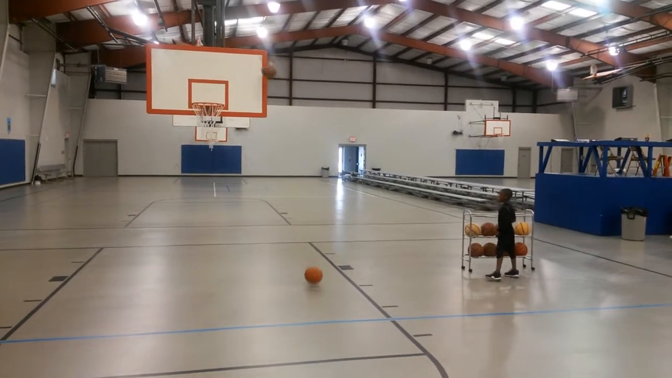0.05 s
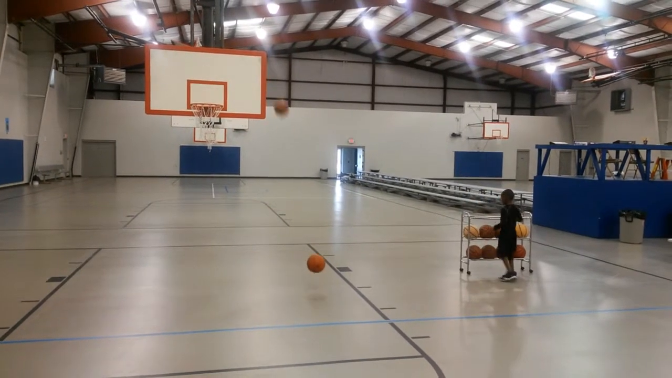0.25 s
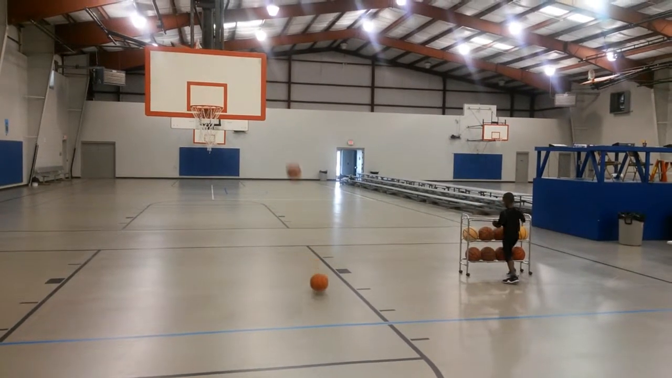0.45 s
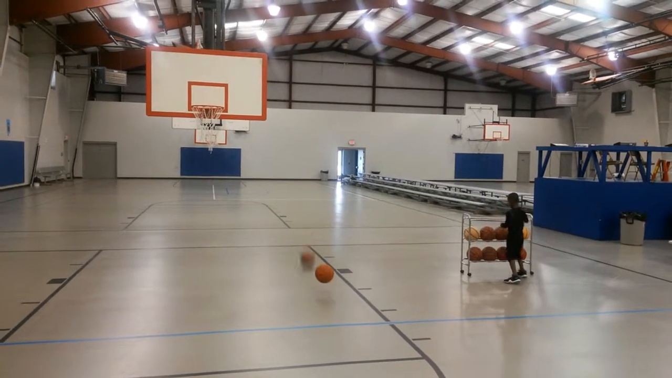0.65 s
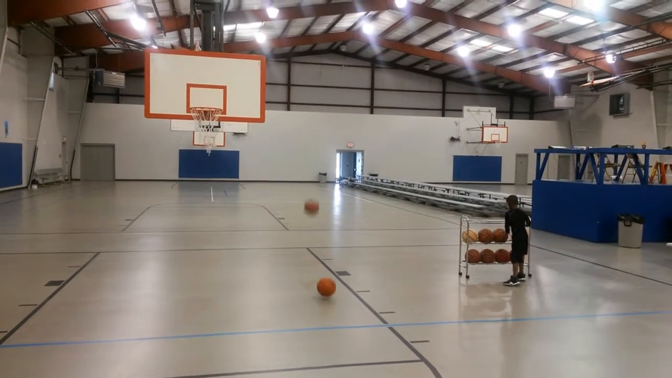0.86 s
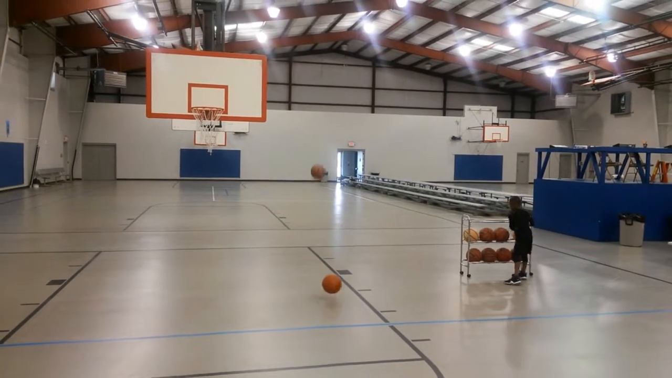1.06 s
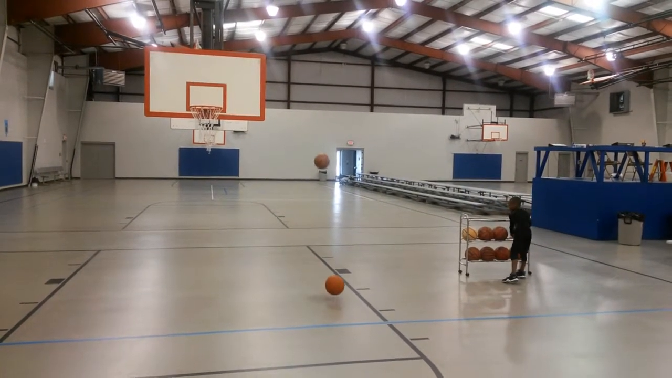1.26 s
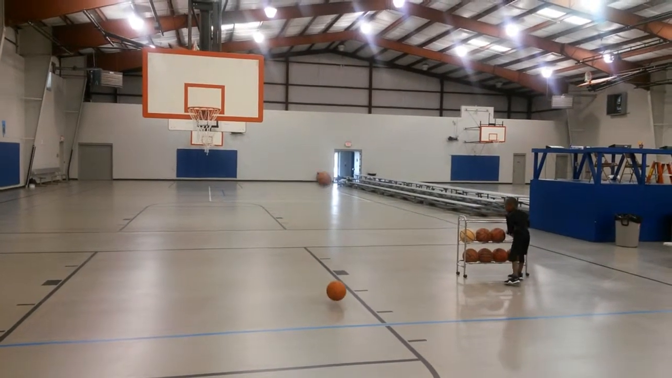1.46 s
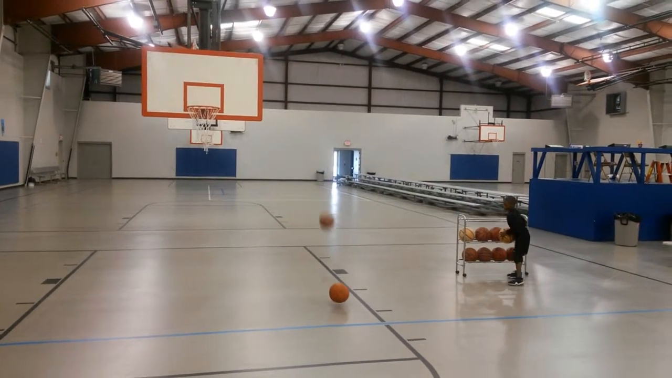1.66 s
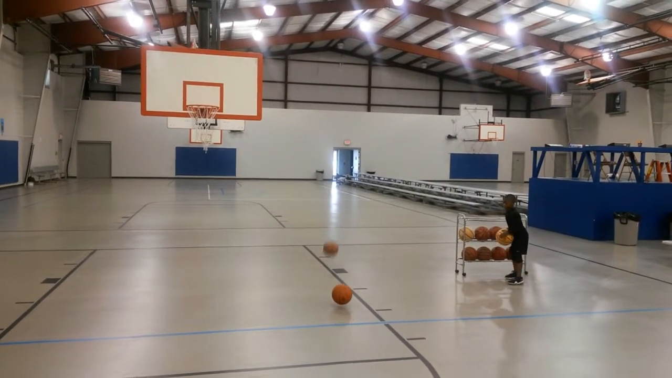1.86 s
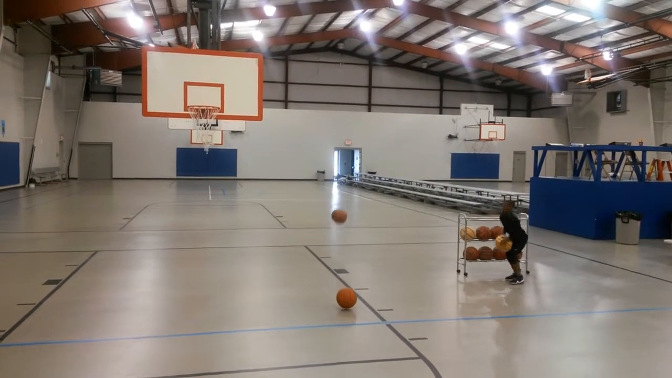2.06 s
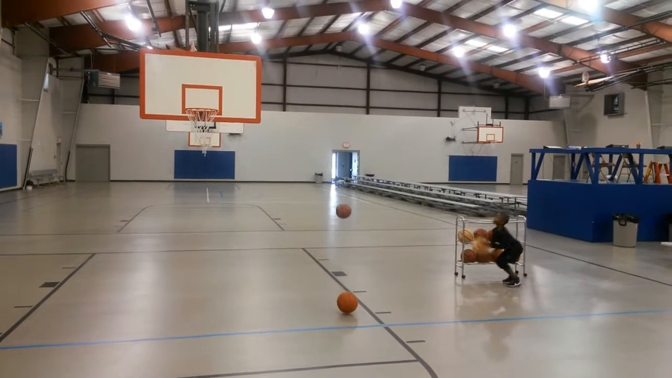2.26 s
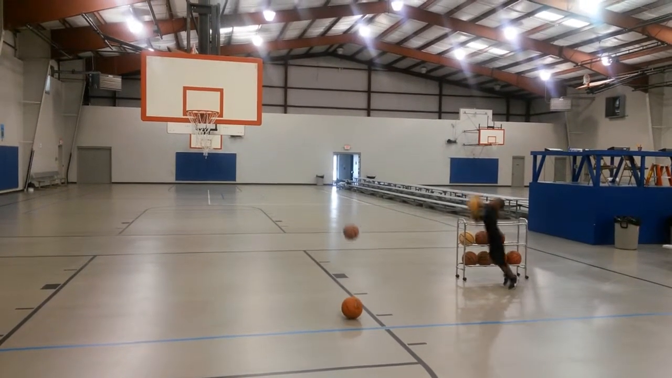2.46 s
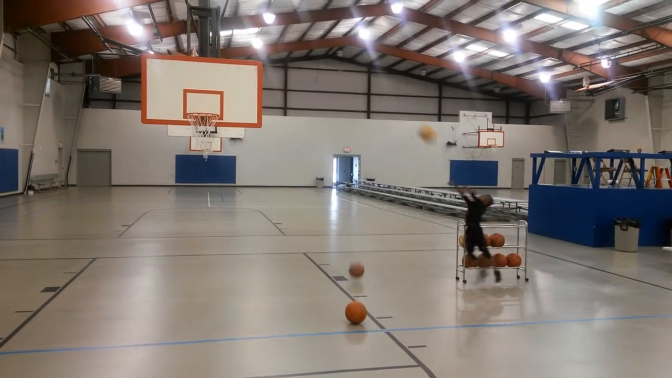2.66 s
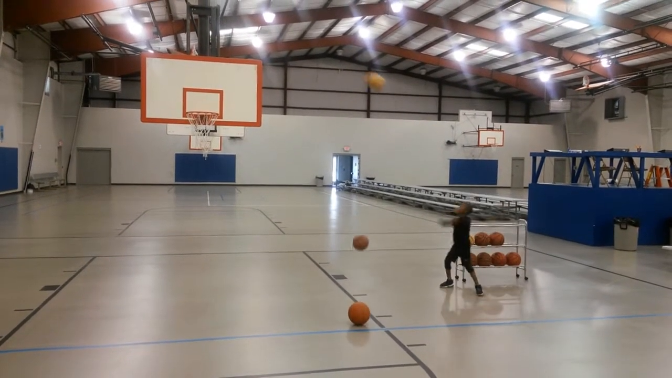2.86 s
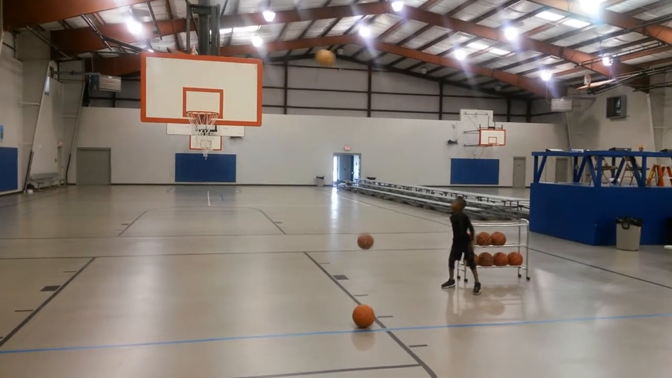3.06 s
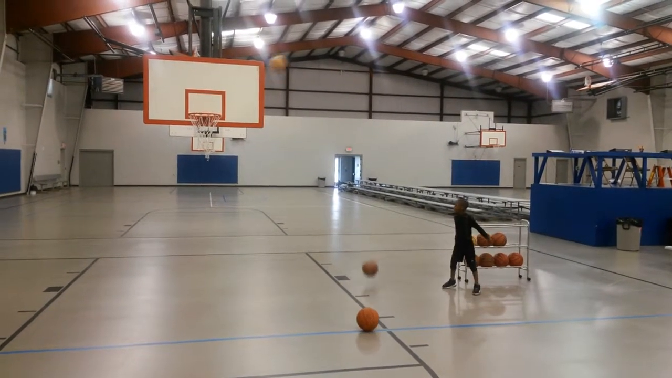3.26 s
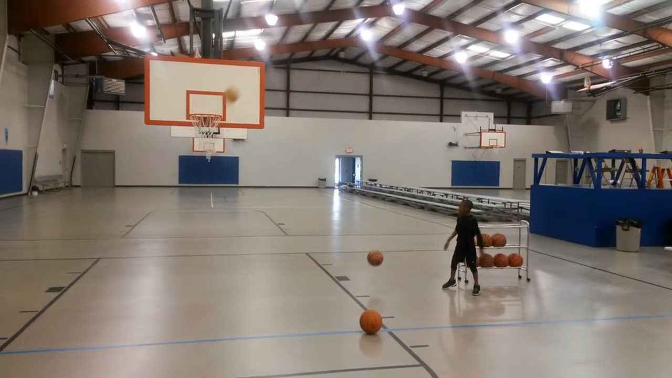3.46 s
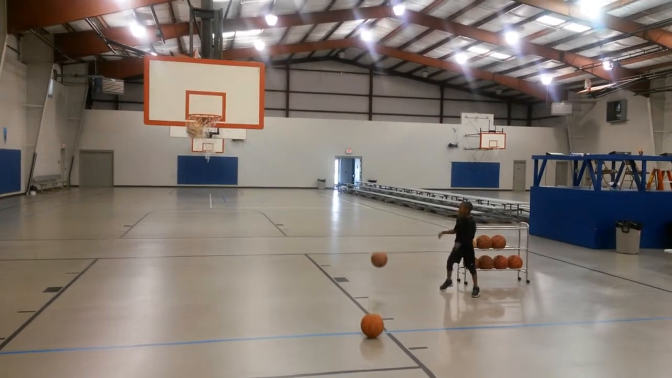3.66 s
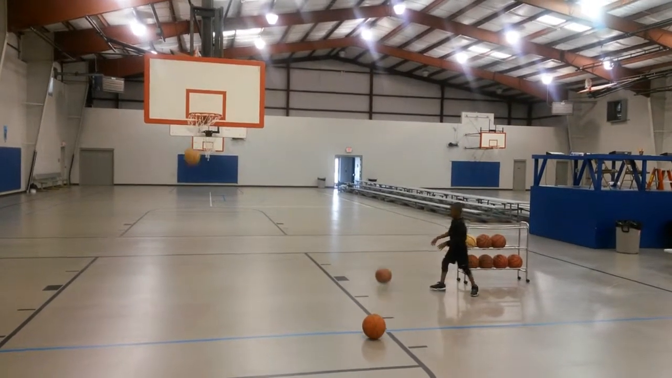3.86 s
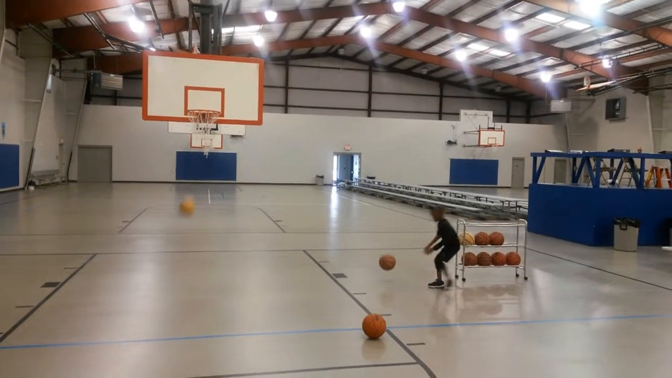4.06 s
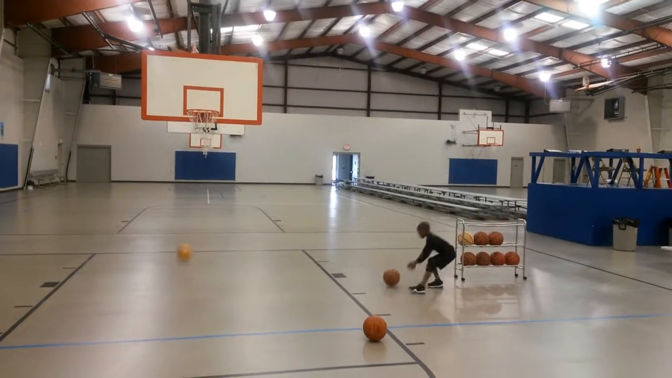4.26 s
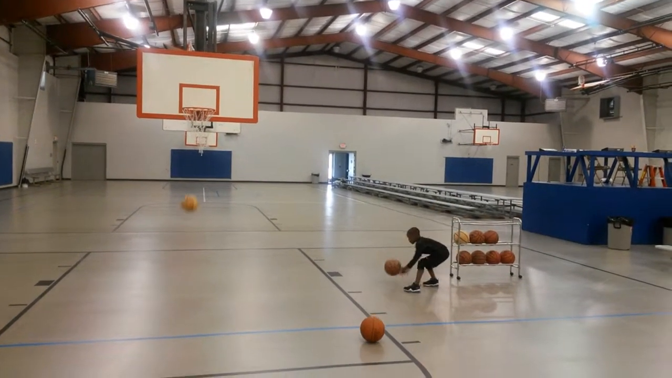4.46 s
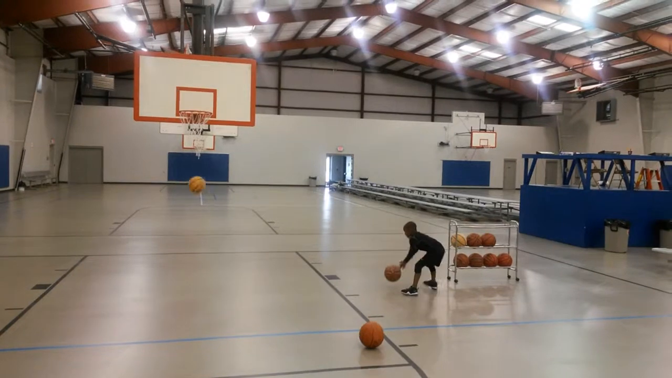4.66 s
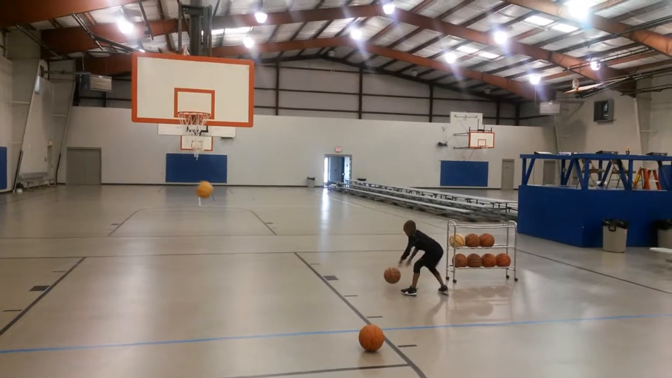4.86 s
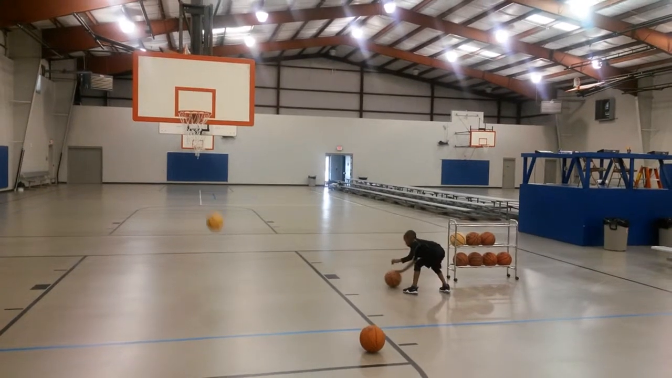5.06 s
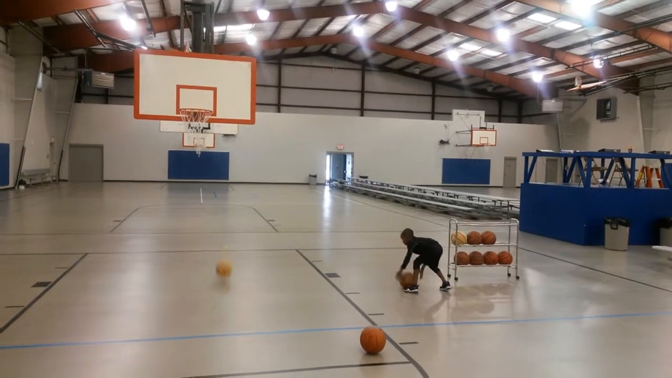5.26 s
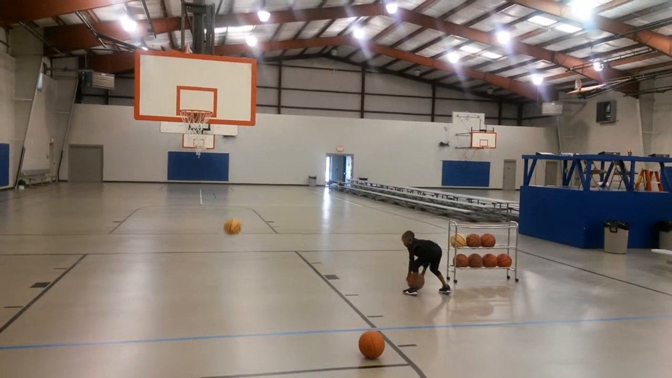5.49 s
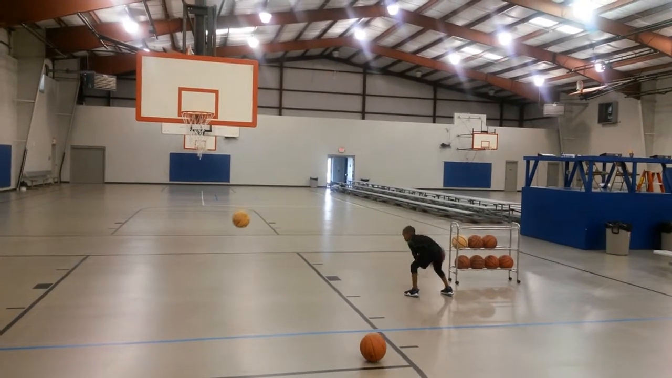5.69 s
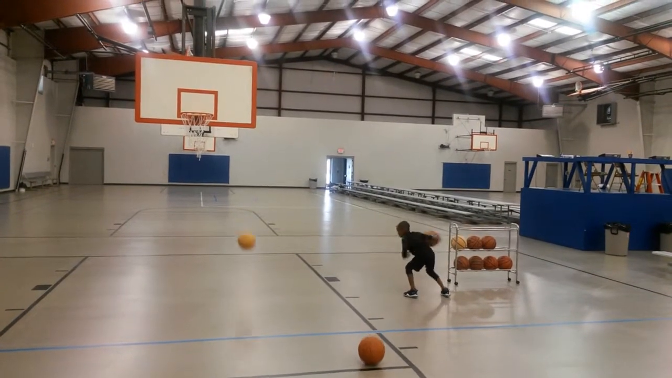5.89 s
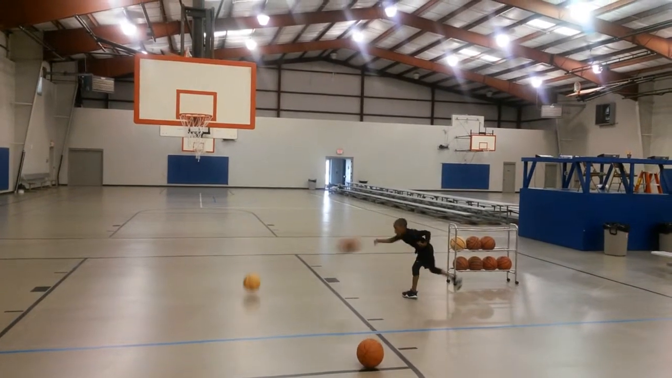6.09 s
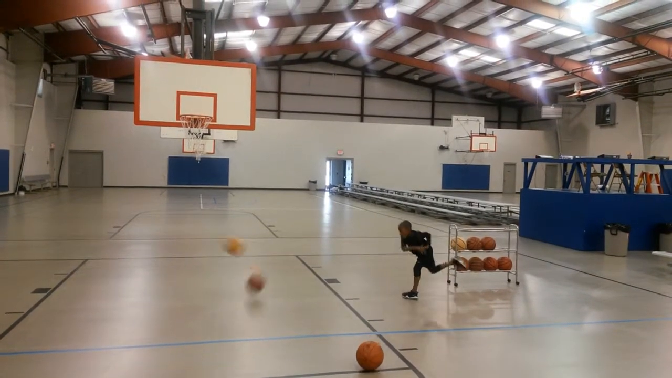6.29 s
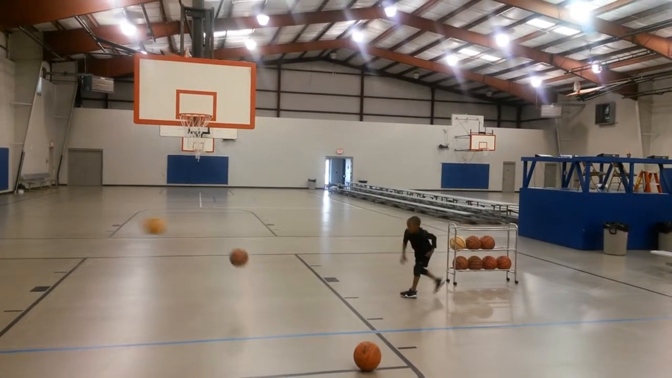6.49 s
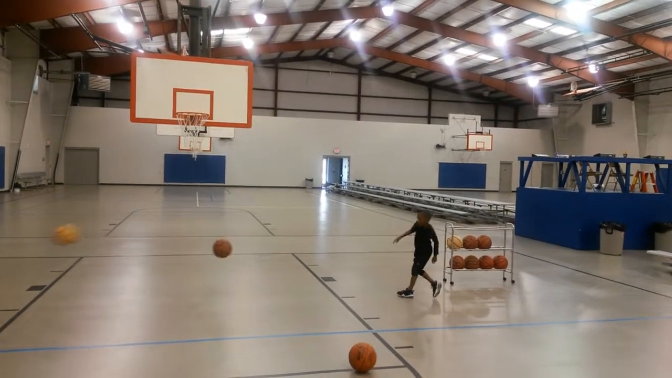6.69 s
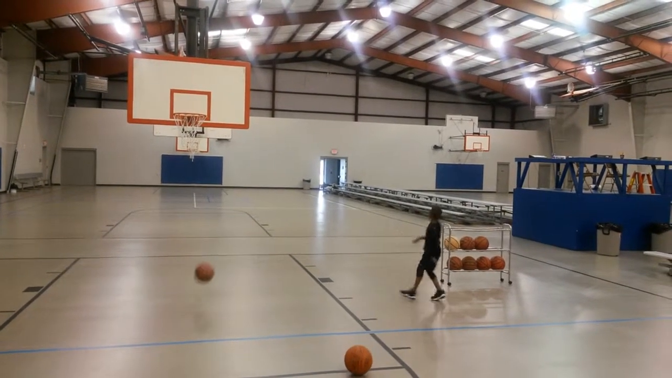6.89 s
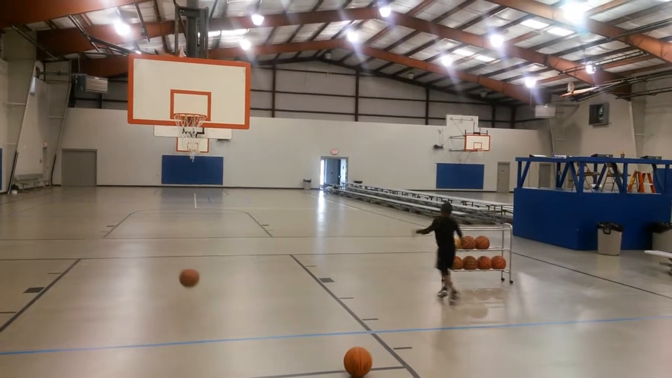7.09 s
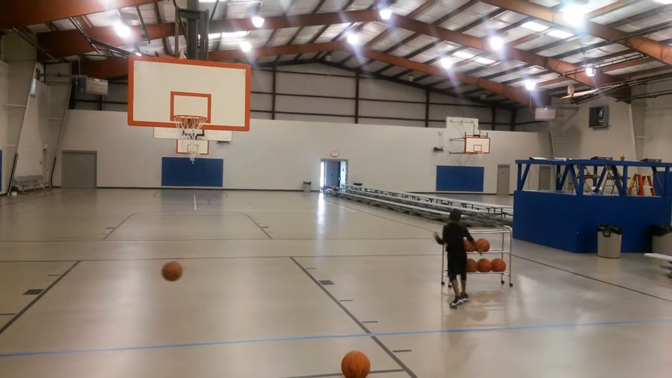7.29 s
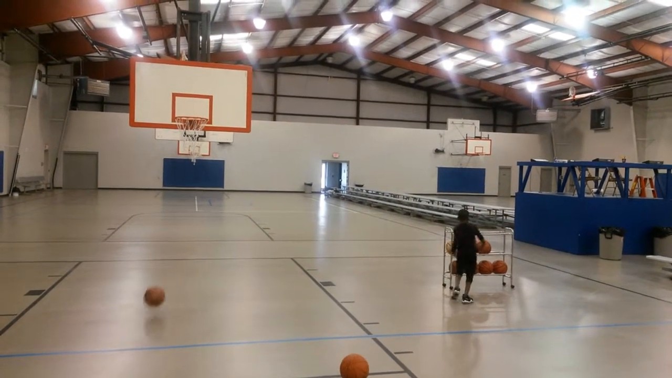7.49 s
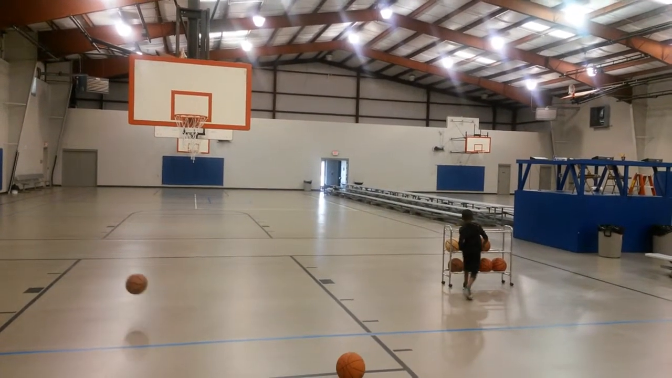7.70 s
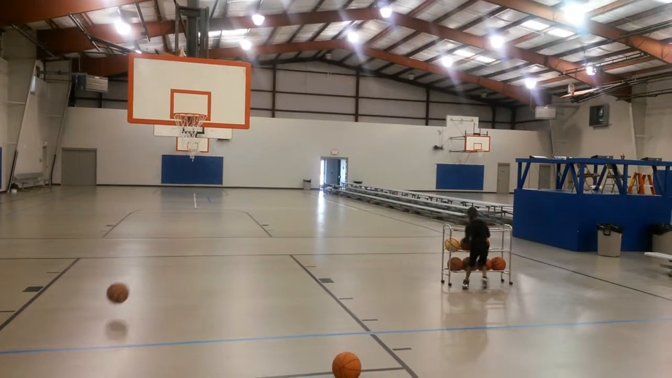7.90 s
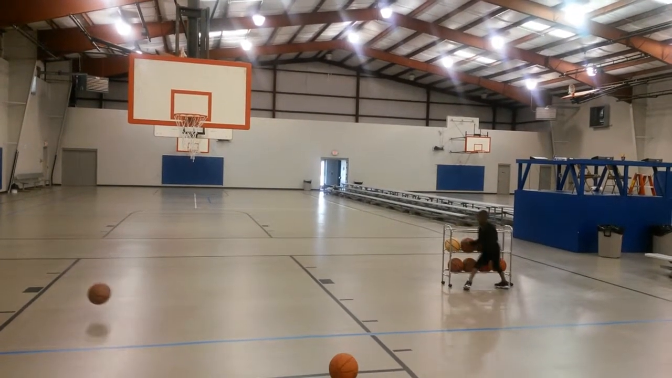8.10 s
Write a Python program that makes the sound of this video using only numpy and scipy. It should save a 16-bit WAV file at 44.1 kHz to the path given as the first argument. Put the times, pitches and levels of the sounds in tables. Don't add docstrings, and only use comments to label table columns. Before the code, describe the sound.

In a large empty gym, several basketballs bounce irregularly on a wooden floor some metres from a handheld stereo microphone. Each is a sharp rubber slap with a brief hollow ring and thud, followed by wall echoes and a long tail. The loudest comes early; a shoe squeaks sharply near three seconds, then the backboard shudders. Lamps buzz thinly over soft ventilation.

```python
import sys
import numpy as np
from scipy import signal
from scipy.fft import rfft, irfft
from scipy.io import wavfile

SR = 44100
rng = np.random.default_rng(int(sys.argv[2]) if len(sys.argv) > 2 else 0)


def linear_from_db(decibels):
    return 10 ** (np.asarray(decibels, float) / 20)


def digitize_waveform(pressure):
    field = np.atleast_2d(pressure).T
    bounded = np.clip(field, -1, 1)
    quanta = np.round(bounded * 32767).astype(np.int16)
    wavfile.write(sys.argv[1], SR, quanta)


N = 358974
PAD = SR
RETURN_DULL_DB = -5

# t/s, slap peak level/dB, thud level/dB, ring level/dB, ring f/Hz
BOUNCES = [(0.1491, -11, -36.5, -27, 2034), (0.584, -10.5, -38, -31.5, 1600), (0.7797, 1.5, -17, -11, 964),
           (1.2479, -14.5, -31.5, -33.5, 1218), (1.912, -9, -26.5, -23.5, 1217),
           (2.7571, -6.5, -31, -24.5, 1154), (3.4178, -14, -32.5, -31.5, 1100),
           (3.948, -18.5, -41.5, -34.5, 1170), (4.335, -4.5, -26.5, -20, 1130),
           (4.362, -21.5, -26.5, -33.5, 1570), (5.361, -4, -29, -21.5, 1250),
           (6.1945, -11, -31.5, -24.5, 1100), (6.349, -9.5, -27, -22, 1683),
           (6.4352, -10.5, -20.5, -20.5, 1060), (7.075, -22, -29, -34.5, 980),
           (7.106, -17.5, -35.5, -26.5, 1140), (7.647, -20, -36.5, -33.5, 1170),
           (8.0835, -22, -39.5, -38.5, 1170)]
# t/s, slap peak level/dB, thud level/dB, ring level/dB
TAPS = [
    (1.501, -24, -52, -39),
    (1.716, -23.5, -65, -39),
    (1.899, -45, -60, -39),
    (4.878, -29, -43.5, -42.5),
    (5.13, -31, -41.5, -42.5),
    (7.7545, -27, -39, -34),
    (7.8106, -19, -60, -47),
]
TAP_HZ = 1720
# delay t/s, slap loss level/dB, thud loss level/dB, ring loss level/dB
WALLS = [
    (.032, -19, -8, -17),
    (.075, -21, -22, -28),
]


def bounces(direct, send):
    for s, slap_db, thud_db, ring_db, ring_hz in BOUNCES + [(*tap, TAP_HZ) for tap in TAPS]:
        lag = left_lag(s)
        add(direct, s, blow(slap_db, thud_db, ring_db, ring_hz), lag)
        near_echo = off_wall(blow(slap_db - 8, thud_db + 3, ring_db, ring_hz))
        add(direct, s + .0098, linear_from_db(-12) * near_echo, -lag)
        for delay_s, *loss_db in WALLS:
            levels_db = np.add([slap_db + RETURN_DULL_DB, thud_db, ring_db], loss_db)
            add(direct, s + delay_s, off_wall(off_wall(blow(*levels_db, ring_hz))), 1)
        farther_db = min(0.2967 * (-21.5 - ring_db), 5)
        add(send, s, linear_from_db(1.63 + farther_db) * all_round(slap_db, thud_db, ring_db), 0)


# f/Hz, level/dB, time to fall 60 dB t/s
BALL = [(720, -5, 0.0093), (958, -13, 0.02), (1250, 0, 0.005), (1680, -3.5, 0.009), (2040, -4, 0.0045),
        (2570, -12, 0.0027), (2960, -11, 0.0017)]
# f/Hz, level/dB, time to fall 60 dB t/s
FLOOR = [(136, 3, 0.02), (188, 3, 0.02), (259, 2.5, 0.017), (340, 1.5, 0.012), (413, -1.5, 0.014),
         (647, -14, 0.013)]
# f/Hz, level/dB, time to fall 60 dB t/s
PORT = [(4060, -4, 0.0017), (5290, 16, 0.0014), (6680, 13.5, 0.0015), (8150, 5, 0.00067),
        (13000, -5.5, 0.0013)]
SLAP_DB = -13


def blow(slap_db, thud_db, ring_db, ring_hz):
    patches = .035 * rng.standard_normal(90) ** 3 * np.exp(-np.arange(90) / 30.)
    patches[0] = 1
    slap = ring(patches, PORT)
    centre_swing = (ring_hz, 0.5, 0.0092)
    air = ring(patches, sorted(BALL + [centre_swing]), ring_hz)
    slow_push = np.hanning(int(.003 * SR))
    thud = np.pad(ring(slow_push, FLOOR), (int(.0012 * SR), 0))[:len(air)]
    crack = np.convolve(patches, np.linspace(1, -1, 12))
    crack = np.pad(crack, (0, len(air) - len(crack)))
    crack = linear_from_db((slap_db + SLAP_DB + ring_db) / 2 - 1) * crack
    return crack + linear_from_db(thud_db) * thud + linear_from_db(ring_db - 2) * air + linear_from_db(slap_db + SLAP_DB) * slap


def ring(push, modes, centre_hz=None):
    t = np.arange(SR // 8) / SR
    hz, db, t60 = np.transpose(modes)[:, :, None]
    if centre_hz:
        db = db - 5 * np.abs(np.log2(hz / centre_hz))
    level_chance, pitch_chance = rng.standard_normal((2, len(modes), 1))
    hz = hz * (1 + .03 * pitch_chance)
    sense = (-1.) ** np.arange(len(modes))[:, None]
    swing = np.sin(2 * np.pi * hz * t) * 1000. ** (-t / t60)
    body = sense * linear_from_db(db + level_chance) * swing
    return unit(np.convolve(np.diff(body.sum(0), prepend=0), push))


def unit(x):
    return x / np.sqrt(np.sum(x[:SR // 100] ** 2) / (SR // 100))


def all_round(slap_db, thud_db, ring_db):
    place = np.log(np.fft.rfftfreq(1024, 1 / SR) + 1)
    levels_db = [thud_db, ring_db, ring_db, slap_db + SLAP_DB]
    colour_db = np.interp(place, np.log([450, 900, 2600, 4200]), levels_db)
    return np.roll(irfft(linear_from_db(colour_db + 31.0)), 128)


# t/s, lag/samples
LEFT_LAG = [(0, 1), (.8, 2), (2.7, -1), (4., -2), (4.3, 7), (6.4, 4), (7.1, 9), (7.7, 13), (8.1, 17)]


def left_lag(s):
    return np.interp(s, *np.transpose(LEFT_LAG))


# t/s, slap peak level/dB, body level/dB
END_WALL = [
    (0.939, -28, -35),
    (0.9448, -9, -34),
    (2.931, -18, -35),
    (4.493, -17, -43),
    (5.523, -17, -44.5),
]


def end_wall(direct):
    for s, slap_db, body_db in END_WALL:
        add(direct, s, off_wall(blow(slap_db + RETURN_DULL_DB, body_db - 9, body_db, 1230)), 1)


def off_wall(x):
    facets = .045 * rng.standard_normal(70) ** 3 * np.exp(-np.arange(70) / 25.)
    facets[0] = 1
    dull = signal.sosfilt(signal.butter(3, 7200, fs=SR, output="sos"), x)
    return np.convolve(dull, facets / np.sqrt(np.sum(facets ** 2)))


# t/s, peak level/dB, f/Hz, length t/ms
SQUEAKS = [
    (0.385, -31, 6300, 6),
    (0.392, -29, 5650, 7),
    (2.8888, -4.5, 6300, 4.8),
]
# delay t/s, loss level/dB
SQUEAK_WALLS = [
    (.0297, -14.5),
    (.0387, -10.5),
    (.0772, -19.5),
]


def squeaks(direct, send):
    for s, peak_db, hz, length_ms in SQUEAKS:
        for delay_s, loss_db in [(0, 0)] + SQUEAK_WALLS:
            add(direct, s + delay_s, squeak(peak_db + loss_db, hz, length_ms), 1)
        add(send, s, linear_from_db(4) * squeak(peak_db, .97 * hz, 1.2), 0)


def squeak(peak_db, hz, length_ms):
    t = np.linspace(0, 1, int(length_ms * SR / 1000))
    uneven = 1 + .25 * np.interp(t, np.linspace(0, 1, 9), rng.standard_normal(9))
    cycles = hz * length_ms / 1000 * (1.03 * t - .04 * t ** 2)
    chirp = uneven * np.sin(np.pi * t) ** 1.5 * np.sin(2 * np.pi * cycles)
    grain = np.hanning(30) * np.sin(2 * np.pi * 0.95 * hz * np.arange(30) / SR)
    slips = .04 * np.convolve(rng.standard_normal(300) * np.linspace(1, .2, 300), grain)
    return linear_from_db(peak_db) * np.concatenate([chirp[:-12], slips])


def band_part(x, hz, kind):
    return signal.sosfiltfilt(signal.butter(2, hz, kind, fs=SR, output="sos"), x)


def add(out, s, x, lag):
    creep = band_part(x, (2900, 4600), "band")
    boost = .05 * np.clip(lag, 0, 8) * creep
    late = round(5 * np.clip(lag - 1, 0, 1))
    left = x - .5 * band_part(x, 7800, "high") - creep + np.roll(creep + boost, late)
    right = x + boost - np.clip(.06 * lag, 0, .55) * band_part(x, (4600, 7400), "band")
    round_body = .88
    paths = [(0, round(lag), round_body * left), (0, 0, (1 - round_body) * left), (1, 0, right)]
    for channel, shift, heard in paths:
        i = PAD + round((s + .0006) * SR) + shift
        out[channel, i:i + len(x)] += heard[:max(out.shape[1] - i, 0)]


# f/Hz, level/dB, time to fall 60 dB t/s, likeness of the two ports/0-1
HALL = [(90, 1, 2.48, 0.94), (221, 3.5, 2.6, 0.87), (380.5, -3.5, 2.1, 0.44), (643, -15, 3.4, 0.1),
        (893, -9.5, 2.1, 0), (1200, -9, 2.17, 0), (1635, -9, 2.36, 0), (2360, -15, 2.9, 0.07),
        (2860, -17, 3.08, 0), (4800, -13.5, 2.21, 0), (5930, -12.5, 2.03, 0.26), (8100, -23.5, 1.8, 0.9),
        (14000, -32.5, 0.56, 0.3)]


def hall(send):
    size = 3 * SR
    t = np.arange(size) / SR
    hz, db, t60, likeness = np.transpose(HALL)
    tail = np.zeros((2, size))
    for k, weight in enumerate(bands(hz, size)):
        noise = irfft(pair(size, likeness[k]) * weight)
        tail += linear_from_db(db[k]) * noise * 1000. ** (-t / t60[k])
    clumps = np.interp(t, np.arange(600) * .005, rng.standard_normal(600))
    tail = tail * linear_from_db(3.5 * clumps * np.exp(-t / .5))
    early = 1 + 3.3 * np.exp(-t / 0.021)
    rise = np.clip((t - .017) / .018, 0, 1)
    late_fill = linear_from_db(-27.5 - 6 * np.exp(-t / 0.36))
    tail = tail * early * rise * late_fill
    return signal.fftconvolve(send[None], tail, axes=1)[:, :len(send)]


def bands(centres_hz, size):
    place = np.log2(np.fft.rfftfreq(size, 1 / SR) + 1)
    return [np.sqrt(np.interp(place, np.log2(centres_hz), row)) for row in np.eye(len(centres_hz))]


def pair(size, likeness):
    mid, side = rfft(rng.standard_normal((2, size)))
    likeness = np.clip(likeness, 0, 1)
    shared = np.sqrt(1 + likeness) * mid
    opposed = np.sqrt(1 - likeness) * side * np.array([[1], [-1]])
    return (shared + opposed) / np.sqrt(2)


# t/s, shaking t/s, panel level/dB, rattle level/dB
BOARD = [
    (3.63, 0.13, -40, -43),
    (3.94, 0.012, -43, -52),
    (4.06, 0.04, -62, -64),
]


def backboard():
    t = np.arange(N) / SR
    f = np.fft.rfftfreq(N, 1 / SR)
    resonance = 1 / (1 + ((f - 95.5) / 19) ** 4)
    panel = irfft(rfft(rng.standard_normal(N)) * resonance, N)
    panel = panel / panel.std()
    rattle_colour = f / (300 + f) / (1 + (f / 1100) ** 2.5)
    rattle = irfft(pair(N, .7) * rattle_colour, N) * (1 + .3 * panel)
    rattle = rattle / rattle.std()
    out = np.zeros((2, N))
    attack_s, last_s = 0.015, .31
    for s, shaking_s, panel_db, rattle_db in BOARD:
        rise = np.clip((t - s) / attack_s, 0, 1)
        stop = np.clip((s + last_s - t) / attack_s, 0, 1)
        after = np.maximum(t - s - attack_s - shaking_s, 0)
        hum = linear_from_db(panel_db - 38 * after) * panel
        out += rise * stop * (hum + linear_from_db(rattle_db - 90 * after) * rattle)
    return out


# f/Hz, rms level/dB
LAMP_LINES = [(6239, -51), (6481, -55), (6600, -54), (6718, -55), (6842, -51), (6961, -52), (8640, -67),
              (9119, -66), (10083, -69), (10923, -71), (11881, -67), (11999, -66), (12839, -64),
              (13803, -64),
              (5760, -59), (6121, -55)]
MAINS_HZ = 120.012


def lamps():
    order = np.arange(38, 121)
    db = -73 + 2. * rng.standard_normal(len(order))
    for hz, line_db in LAMP_LINES:
        db[round(hz / MAINS_HZ) - order[0]] = line_db
    near = np.arange(-12, 13)
    phase = 2j * np.pi * rng.random((2, len(order), len(near)))
    wander = .26 * order[:, None] / 60 * np.exp(-np.abs(near) / 4 + phase)
    side_chance, phase_chance = rng.standard_normal((2, len(order), 1))
    side = linear_from_db(-10) + 1j * .85 * (1 + 0.18 * side_chance)
    ports = np.exp(1j * .9 * phase_chance) * np.array([1 + side, 1 - side])
    bins = np.round(order * MAINS_HZ * N / SR).astype(int)[:, None] + near
    spectrum = np.zeros((2, N // 2 + 1), complex)
    spectrum[:, bins] = linear_from_db(db)[:, None] * ports * np.where(near == 0, 1, wander) * N / np.sqrt(2)
    return irfft(spectrum, N)


# f/Hz, level/dB per Hz
AIR = [(25, -30), (60, -5), (130, 8), (280, 2.5), (600, -11.5), (1500, -12.5), (3000, -26), (5000, -16),
       (6500, -26), (7600, -8), (10500, -58), (13000, -49), (14500, -80)]


def ventilation():
    f = np.fft.rfftfreq(N, 1 / SR) + 1
    hz, db = np.transpose(AIR)
    colour = linear_from_db(np.interp(np.log(f), np.log(hz), db))
    likeness = (f > 45) * .98 / (1 + (f / 700) ** 2)
    rush = irfft(pair(N, likeness) * colour, N)
    return linear_from_db(-52) * rush / rush.std()


def scene():
    direct, send = np.zeros((2, PAD + N)), np.zeros((2, PAD + N))
    bounces(direct, send)
    end_wall(direct)
    squeaks(direct, send)
    add(send, -.4, all_round(-1, -14, -12.5), 0)
    events = (direct + hall(send[0]))[:, PAD:]
    return events + backboard() + lamps() + ventilation()


def top_cut(x):
    return signal.sosfilt(signal.butter(12, 15450, fs=SR, output="sos"), x)


def record(dry):
    thin = signal.sosfilt(signal.butter(3, 103.6, "high", fs=SR, output="sos"), dry)
    low = signal.sosfilt(signal.ellip(6, .3, 32, 14550, fs=SR, output="sos"), thin)
    return top_cut(np.clip(low, -1, 1))


dry = scene()
out = record(dry)
digitize_waveform(out)
```